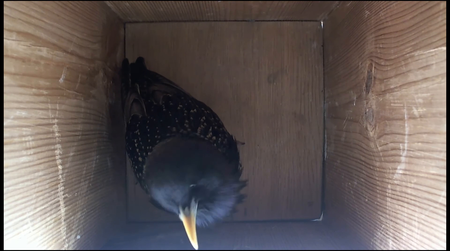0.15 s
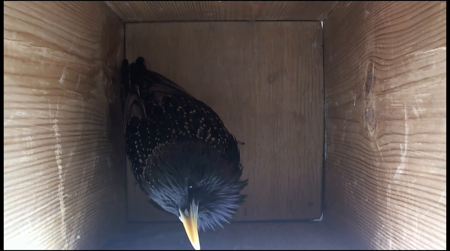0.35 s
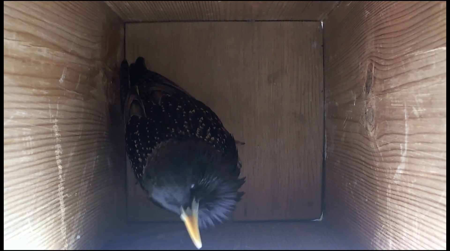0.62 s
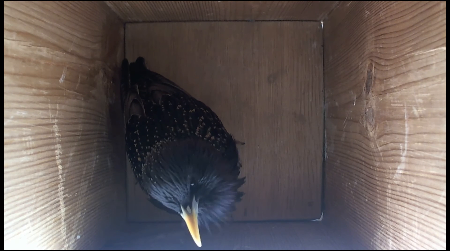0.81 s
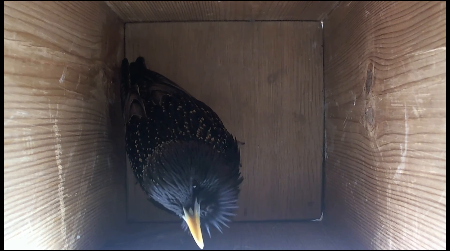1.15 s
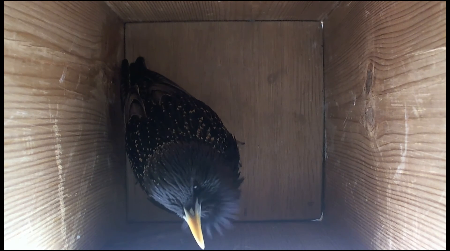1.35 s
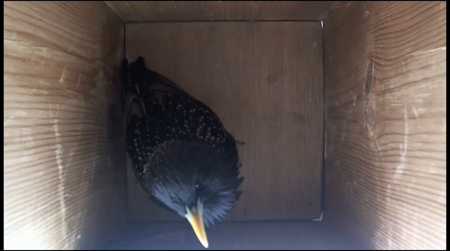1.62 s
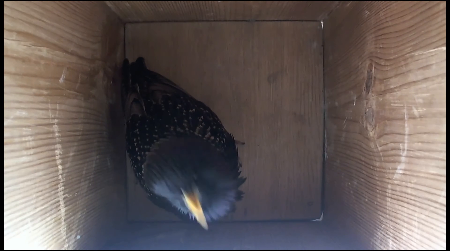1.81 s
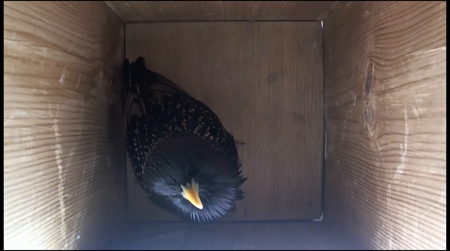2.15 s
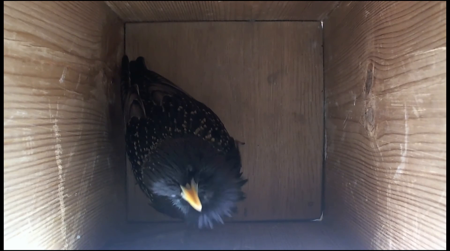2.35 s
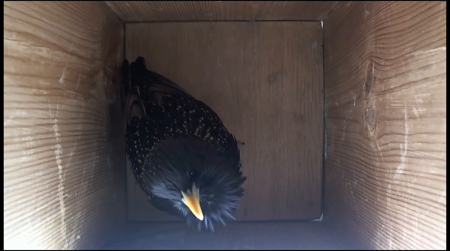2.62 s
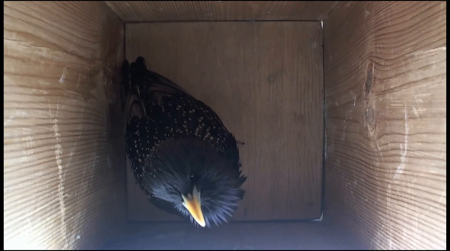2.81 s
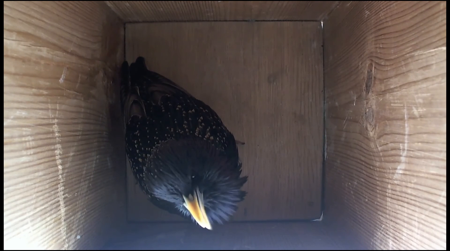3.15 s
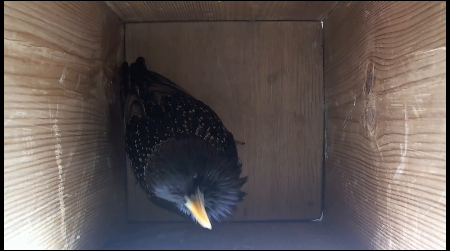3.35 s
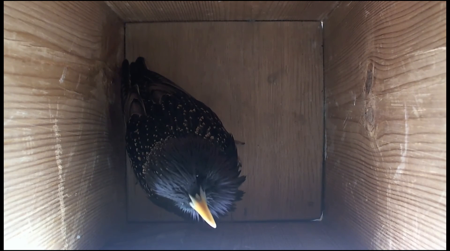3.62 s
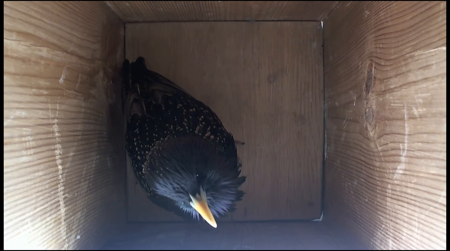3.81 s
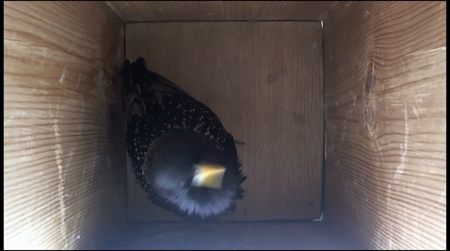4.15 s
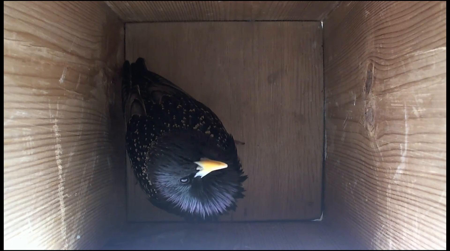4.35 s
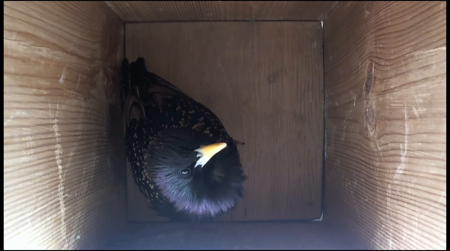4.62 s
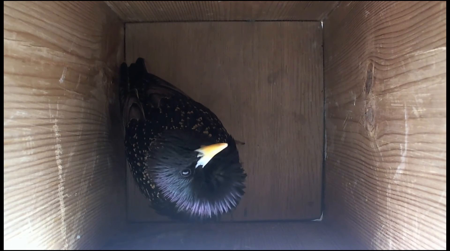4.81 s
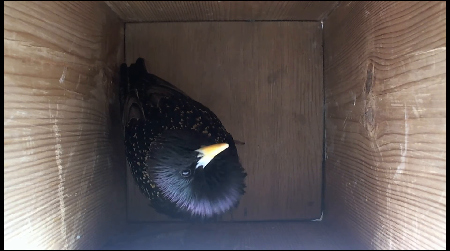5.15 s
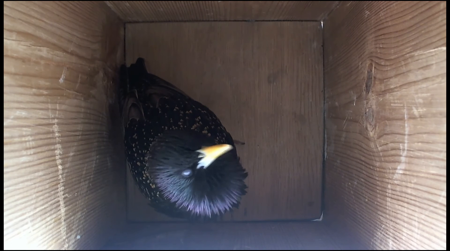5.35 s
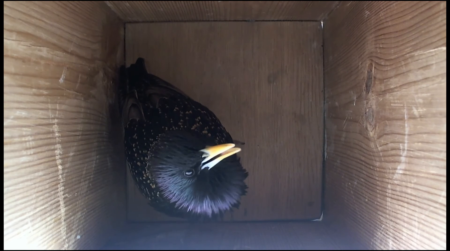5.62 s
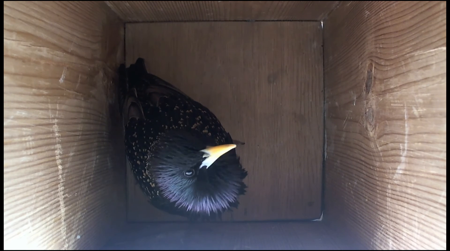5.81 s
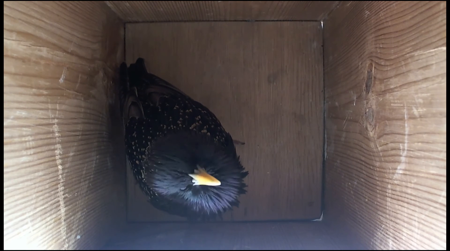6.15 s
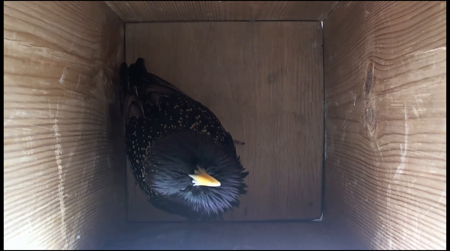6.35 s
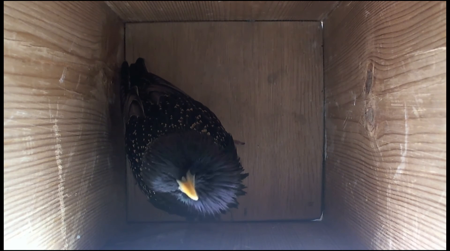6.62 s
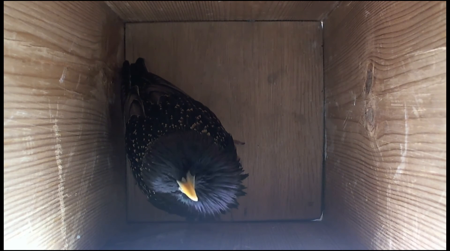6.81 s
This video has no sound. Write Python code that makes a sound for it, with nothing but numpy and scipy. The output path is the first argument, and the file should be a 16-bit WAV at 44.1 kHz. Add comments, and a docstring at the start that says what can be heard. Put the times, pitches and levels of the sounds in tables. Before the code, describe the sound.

A starling sings very close inside a small wooden nest box: whistles, reedy chucks, creaking, then two phrases of rattle, trill and upsweeps.

```python
"""Starling in a nest box

A starling sings inside a wooden nest box, close to a small overloaded microphone. Its two-sided syrinx, built from
swept oscillators, gives whistles, chucks, grunts and a creak, then twice a phrase of rattle, falling whistle,
rasp, trill and two upsweeps. Outside air, as coloured noise, hums faintly in the box; soft bumps and a far bird
are short swells of noise through resonances."""
import sys
import numpy as np
from scipy import signal
from scipy.fft import rfft, irfft, next_fast_len
from scipy.io import wavfile
from scipy.ndimage import uniform_filter1d, map_coordinates

SR = 44100
rng = np.random.default_rng(int(sys.argv[2]) if len(sys.argv) > 2 else 0)


def store_wav(level_fs):
    """Save 16-bit WAV to argv[1]."""
    pcm = np.round(np.clip(np.atleast_2d(level_fs), -1, 1) * 32767)
    wavfile.write(sys.argv[1], SR, pcm.T.astype(np.int16))


N = 307355
T = np.arange(N) / SR

# hoarse grunts: t/s, length/s, f/Hz, voice level/dB, rasp level/dB, low thud level/dB
GRUNTS = [(0, 0.024, 459, -23.5, -26.5, -38), (0.565, 0.038, 385.5, -17, -30.5, -25),
          (.815, 0.022, 426, -15, -21.5, -19.5), (1.353, 0.038, 503, -27, -41, -53),
          (2.247, 0.038, 434, -13, -27.5, -34), (2.313, 0.043, 397.5, -10.5, -16, -33),
          (4.609, 0.061, 398.7, -12, -20.5, -57)]
# relative spectrum of the hoarse noise: f/Hz, level/dB
HOARSE_SPECTRUM = [(220, -31.5), (350, -19.5), (700, -20), (1000, 13), (1250, -15.5), (1500, -5),
                   (2350, -0.5), (2900, -24.5), (4500, -7.5), (5500, -21), (6800, -34.5), (8800, -26),
                   (14000, -34.5)]
# resonances of the rough voice: f/Hz, half-width/Hz, level/dB
RASP_MODES = [(1131, 37, -10.5), (1498, 430, -8), (2250, 300, -2.5), (3630, 1600, -4.5), (4700, 420, -0.5)]
# the phrase, sung twice: t/s, first f of the falling whistle/Hz, arch level/dB, rasp level/dB,
# trill length/s, trill level/dB
PHRASES = [(2.378, 2735, -22.5, -16.5, 0.19, -7.5), (4.708, 2607, -14.5, -14.5, 0.21, -9)]
SETTLE_S = .024  # time constant with which a run of pulses settles after its hard start


def from_db(db):
    """Amplitude ratio of a level: 20 dB per factor of ten."""
    return 10 ** (np.asarray(db) / 20)


def rms_one(x):
    """Normalisation to unit mean power."""
    return x / np.sqrt(np.mean(x ** 2) + 1e-20)


def loudness(x):
    """Short-time energy: the running rms over 120 samples, a few milliseconds."""
    return np.sqrt(np.abs(uniform_filter1d(x ** 2, size=120)))


def add(out, t, sound):
    """Linear superposition of a sound at its times."""
    start = int(round(t[0] * SR))
    out[start:start + len(t)] += sound


def pan(x, left_db):
    """Level difference between the two channels places a sound."""
    return x * from_db([[left_db / 2], [-left_db / 2]])


def burst(start, length):
    """Times and raised-cosine-edged envelope of one short sound."""
    t = T[max(int(start * SR), 0):][:max(int(length * SR), 64)]
    return t, signal.windows.tukey(len(t), .8)


def push(start, length, attack_s, release_s, swell_db=0):
    """One push of air pressure: its times, progress 0-1 and gain (attack, swelling hold, release)."""
    t = T[max(int(start * SR), 0):][:int(length * SR)]
    u = np.linspace(0, 1, len(t))
    attack = np.clip((t - t[0]) / attack_s, 0, 1)
    release = np.clip((t[-1] - t) / release_s, 0, 1)
    return t, u, np.sin(np.pi / 2 * attack * release) ** 2 * from_db(swell_db * (u - .5))


def settle(t, time_s):
    """Exponential relaxation from 1 towards 0 after the start of a note."""
    return np.exp(-(t - t[0]) / time_s)


def wobble(t, hz):
    """Band-limited chance: a spline through hz random knots a second, spread about 1."""
    knots = rng.standard_normal(int((t[-1] - t[0]) * hz) + 4)
    return map_coordinates(knots, [(t - t[0]) * hz + 1], mode="nearest")


def turn(hz):
    """Phase of an oscillator: the time integral of its frequency."""
    return 2 * np.pi * np.cumsum(hz) / SR


def noise(spectrum):
    """Spectral shaping colours white noise, rms 1; levels join straight along log frequency."""
    hz, db = np.transpose(spectrum)
    size = next_fast_len(N)
    log_hz = np.log(np.fft.rfftfreq(size, 1 / SR) + 1)
    gain = from_db(np.interp(log_hz, np.log(hz), db))
    return rms_one(irfft(rfft(rng.standard_normal(size)) * gain, size)[:N])


def resonate(x, modes):
    """Parallel resonances, each a pole pair applied twice for dark valleys."""
    out = 0
    for hz, width_hz, db in modes:
        r = np.exp(-2 * np.pi * width_hz / SR)  # the width is half the bandwidth of one section
        section = [(1 - r * r) / 2, 0, (r * r - 1) / 2, 1, -2 * r * np.cos(2 * np.pi * hz / SR), r * r]
        out = out + from_db(db) * signal.sosfilt([section, section], x + 1e-18)
    return out


def swells(events, modes):
    """Filtered noise: short swells in a few resonances."""
    level = np.zeros(N)
    for s, length, db in events:
        t, gain = burst(s, length)
        add(level, t, from_db(db) * gain)
    return level * rms_one(resonate(rng.standard_normal(N), modes))


def box_air():
    """Broadband air noise coloured by the box; a weak opposed part decorrelates the channels."""
    # relative spectrum of the air in the box: f/Hz, level/dB
    air_spectrum = [(18, -72), (30, -41), (108, -14), (137, -3), (156, -2), (177, -16), (202, 3),
                    (249, -20), (359, 2), (410, -1), (747, -22.5), (1050, -21), (1680, -34), (2360, -21),
                    (3070, -42.5), (10500, -49.5), (15500, -65)]
    # its course: t/s, level/dB
    air_course = [(0, -58.5), (5.5, -56), (6.9, -51.5)]
    common = noise(air_spectrum)
    opposed = from_db(-20.5) * noise(air_spectrum) * [[1], [-1]]
    return from_db(np.interp(T, *np.transpose(air_course))) * (common + opposed)


def far_drone():
    """Resonance turns far noise into a hum in the box."""
    # box resonances: f/Hz, half-width/Hz, level/dB
    drone_modes = [(1020, 136, 1), (2330, 140, -7)]
    # course of the hum: t/s, level/dB
    drone_course = [(0, -80.5), (3.5, -75), (5.8, -67), (6.9, -63.5)]
    hum = rms_one(resonate(rng.standard_normal(N), drone_modes))
    return from_db(np.interp(T, *np.transpose(drone_course))) * hum


def grunts(jitter, flutter, dull_hz=2600, low_hz=290):
    """Flow modulation: a slack low vibration lets out a puff of noise on each cycle; harder is brighter."""
    voice, puffs, hoarse = np.zeros(N), np.zeros(N), noise(HOARSE_SPECTRUM)
    for s, length, hz, db, rasp_db, _ in GRUNTS:
        t, gain = burst(s, length)
        wave = np.sin(turn(hz * (1 + jitter * wobble(t, 400))))
        add(voice, t, np.sqrt(2) * from_db(db) * gain * wave * (1 + flutter * wobble(t, 400)))
        add(puffs, t, from_db(rasp_db) * gain * (1 + .5 * wave))
    dull = signal.sosfilt(signal.butter(4, dull_hz, fs=SR, output="sos"), noise(HOARSE_SPECTRUM))
    bright = puffs / puffs.max()
    rasp = puffs * (bright * hoarse + (1 - bright) * dull)
    return signal.sosfilt(signal.butter(4, low_hz, "high", fs=SR, output="sos"), voice + rasp)


def thuds():
    """Forced resonance: low modes of the box sound under the grunts."""
    # f/Hz, half-width/Hz, level/dB
    chest_modes = [(117.6, 37, -4.5), (190, 46, 2.5)]
    return swells([(row[0], row[1], row[-1]) for row in GRUNTS], chest_modes)


def whistles(notes, jitter, third_db, hoarse_db):
    """Near-sinusoidal oscillation, slightly wavering, with weak overtones and a trace of noise."""
    out, hoarse = np.zeros(N), rms_one(resonate(rng.standard_normal(N), RASP_MODES[-2:]))
    for t, hz, gain, octave_db in notes:
        phase = turn(hz * (1 + jitter * wobble(t, 660)))
        # third harmonic and noise are levelled against the octave
        overtones = np.sin(2 * phase) + from_db(third_db) * np.sin(3 * phase)
        overtones = overtones + from_db(hoarse_db) * np.interp(t, T, hoarse)
        overtones = overtones * from_db(1.5 * wobble(t, 120))
        gain = gain * from_db(.6 * wobble(t, 70))
        add(out, t, np.sqrt(2) * gain * (np.sin(phase) + from_db(octave_db) * overtones))
    return out


def opening_notes(pip_octave_db=-34, high_octave_db=-39, drop_s=0.013):
    """Frequency glides: a pip, a long whistle scooping in and out, a loud higher one; the last two sag."""
    # each: t/s, length/s, f/Hz, level/dB
    pip_note = (.108, 0.0447, 3306.5, -26)
    high_note = (0.3975, 0.14, 2972, 0.51)
    # the long first whistle: t/s, fundamental level/dB, octave level/dB
    first_levels = [(0.122, -36.5, -35), (0.134, -17, -15), (0.146, -16, -16), (0.202, -26.5, -26.5),
                    (0.23, -16.5, -25), (0.372, -10.5, -24.5), (0.386, -13, -16.5), (0.398, -19.5, -29.5)]
    first_hz, first_sag_hz_per_s = 2662, 400
    scoop_hz, scoop_s = 370, .021
    overshoot_hz, overshoot_s, high_sag_hz_per_s = 260, .016, 890
    bow_db = 9  # the higher note is loudest in its middle

    s, length, hz, db = pip_note
    t, u, gain = push(s, length, attack_s=0.01, release_s=0.01497)
    yield t, hz + 0 * u, from_db(db) * gain, pip_octave_db

    s, low_db, octave_db = np.transpose(first_levels)
    t, u, gain = push(s[0], s[-1] - s[0], attack_s=0.0068, release_s=.004)
    scoop = settle(t, scoop_s) + settle(t, drop_s)[::-1]
    hz = first_hz - first_sag_hz_per_s * (t - t[0]) - scoop_hz * scoop
    yield t, hz, gain * from_db(np.interp(t, s, low_db)), np.interp(t, s, octave_db - low_db)

    s, length, hz, db = high_note
    t, u, gain = push(s, length, attack_s=.006, release_s=0.015)
    gain = gain * from_db(bow_db * (np.sin(np.pi * u) ** 3 - 1))
    hz = hz + overshoot_hz * settle(t, overshoot_s) - high_sag_hz_per_s * (t - t[0])
    yield t, hz, from_db(db) * gain, high_octave_db


def glides(notes, jitter, jitter_hz, flutter, octave_db, third_db=-60, swing_hz=0):
    """Frequency modulation: random jitter roughens a gliding tone, a fast regular swing makes a trill."""
    trill_hz = 65.3
    out = np.zeros(N)
    for t, hz, gain in notes:
        swing = swing_hz * np.sin(2 * np.pi * trill_hz * (t - t[0]) + .2 * wobble(t, 60))
        phase = turn(hz * (1 + jitter * wobble(t, jitter_hz)) + swing)
        gain = gain * (1 + flutter * wobble(t, jitter_hz))
        wave = np.sin(phase) + from_db(octave_db) * np.sin(2 * phase) + from_db(third_db) * np.sin(3 * phase)
        add(out, t, np.sqrt(2) * gain * wave)
    return out


def overlap(x):
    """Interference: early returns from the walls beat against a fast-moving tone."""
    # strongest early returns: delay/s, level/dB
    wall_echoes = [(.0021, -3.5), (.0046, -5.5)]
    return x + sum(from_db(db) * np.interp(T - delay, T, x) for delay, db in wall_echoes)


def rasp_notes(break_glide_hz=650):
    """Two independent oscillators: one rough strand as the voice cracks, two climbing in each phrase."""
    # the voice cracks between two notes: t/s, length/s, f/Hz, level/dB
    crack = (.381, .036, 2850, -8)
    # both sides of the syrinx climb at once: from f/Hz, to f/Hz
    strands = [(2000, 3300), (2550, 4450)]
    s, length, hz, db = crack
    t, u, gain = push(s, length, attack_s=.018, release_s=.012)
    yield t, hz + break_glide_hz * (u - .5), from_db(db) * gain
    for s, _, _, db, *_ in PHRASES:
        for from_hz, to_hz in strands:
            t, u, gain = push(s + 0.427, .109, attack_s=0.028, release_s=.02, swell_db=10)
            yield t, from_hz + (to_hz - from_hz) * u, from_db(db) * gain


def rasping():
    """Nonlinear coupling: in the phrases two membranes beating together break into broad noise."""
    strands = overlap(glides(rasp_notes(), jitter=.028, jitter_hz=900, flutter=.35, octave_db=-27))
    broad = rms_one(resonate(rng.standard_normal(N), RASP_MODES))
    return strands + from_db(-14.5) * loudness(strands) * (T > PHRASES[0][0]) * broad


def following_noise(high, rasps):
    """Envelope following: broadband noise that follows the loudness of the high voices and the rasps."""
    # relative spectrum: f/Hz, level/dB
    following_spectrum = [(200, -29.5), (2000, -5.5), (4500, 11.5), (6000, 1), (7000, -12), (8700, -2),
                          (11000, -9.5), (14000, -5.5)]
    return loudness(from_db(-36) * high + from_db(-47) * rasps) * noise(following_spectrum)


def chucks(jitter, rasp_db=-14, uneven_db=3.0):
    """Harmonic series of a slapping valve: the membranes shut for a moment, with rasp."""
    # reedy chucks: t/s, f/Hz, level/dB
    chuck_notes = [(.555, 908.5, -13), (.804, 842, -18), (1.077, 862, -21.5), (1.102, 868, -19),
                   (1.13, 994, -12), (1.157, 1041, -12), (1.188, 1064, -10.5), (1.218, 1019, -9),
                   (1.248, 898, -18.5), (1.282, 780, -19), (1.311, 732.5, -22.5)]
    # how throat and box weight the harmonics: f/Hz, level/dB
    colour = [(720, -16), (850, -5), (1020, -3), (1450, 2.5), (1700, -8), (2050, -2), (3000, -20.5),
              (4400, -25), (5400, -26.5)]
    out, rasp = np.zeros(N), noise(HOARSE_SPECTRUM)
    for s, hz, db in chuck_notes:
        t, u, gain = push(s, 0.028, attack_s=0.0075, release_s=0.016)
        phase = turn(hz * (1 + jitter * wobble(t, 670)))
        tone = 0
        for k in range(1, 6):
            weight = from_db(np.interp(k * hz, *np.transpose(colour)))
            uneven = from_db(uneven_db * (k > 1) * wobble(t, 150))
            tone = tone + weight * np.sin(k * phase + (k - 1) * np.pi / 2) * uneven
        add(out, t, np.sqrt(2) * from_db(db) * gain * (tone + from_db(rasp_db) * np.interp(t, T, rasp)))
    return out


def rattle(runs, modes, jitter, scatter, soft_hz):
    """Impulse excitation: soft pulses, each with a puff of noise, ring the throat and the box."""
    out, soft = np.zeros(N), signal.butter(6, soft_hz, fs=SR, output="sos")
    for t, per_s, gain in runs:
        cycles = np.floor(np.cumsum(per_s * (1 + jitter * wobble(t, 100))) / SR)
        pulses = np.diff(cycles, prepend=-1)
        puffs = signal.lfilter([1], [1, -.992], pulses) * rng.standard_normal(len(t))
        excitation = signal.sosfilt(soft, pulses + scatter * puffs)
        add(out, t, gain * rms_one(resonate(excitation, modes)))
    return out


def creak_runs(hurry_per_s=55, accent_db=8):
    """Relaxing pulse rate: the creak starts fast and hard, then idles."""
    # syrinx pulses: t/s, length/s, level/dB
    creak_run = (.828, 0.27, -28.5)
    s, length, db = creak_run
    t, u, gain = push(s, length, attack_s=0.0089, release_s=0.065)
    pulses_per_s = 76 + hurry_per_s * settle(t, SETTLE_S)
    yield t, pulses_per_s, gain * from_db(db + accent_db * settle(t, SETTLE_S))


def creaking():
    """Source and filter: the creak's pulses ring throat and box resonances."""
    # f/Hz, half-width/Hz, level/dB
    creak_modes = [(226, 86, -5), (406.5, 27, 5), (1030, 22, 2), (1420, 34, -12), (1880, 62, -16)]
    return rattle(creak_runs(), creak_modes, jitter=0.045, scatter=0.1, soft_hz=2800)


def low_tones():
    """Linear frequency glides: short low tones; the first is the box ringing near 1000 Hz between the chucks."""
    # t/s, length/s, f/Hz, glide/Hz, level/dB
    tones = [(1.12, 0.17, 1031, 47.5, -19.5), (2.239, 0.041, 1046, -100, -30.5),
             (2.283, 0.034, 885, 75, -26), (2.303, .044, 1013, 171, -11.5),
             (4.603, 0.048, 1023, -13.5, -17.5)]
    for s, length, hz, glide_hz, db in tones:
        t, gain = burst(s, length)
        yield t, hz + glide_hz * np.linspace(-.5, .5, len(t)), from_db(db) * gain


def far_chips():
    """Band-limited noise bursts: another bird's chips."""
    # t/s, length/s, level/dB
    chips = [(1.468, .025, -69), (1.605, 0.027, -67), (1.745, 0.03, -65.5)]
    # f/Hz, half-width/Hz, level/dB
    chip_modes = [(2300, 600, -1), (3950, 390, 1.5)]
    return swells(chips, chip_modes)


def bumps():
    """Modal response: uneven low noise and soft bumps share two resonances."""
    # soft low bumps: t/s, length/s, level/dB
    bump_events = [(2.14, 0.071, -38.5), (3.57, 0.061, -40.5), (4.29, 0.047, -42), (5.88, 0.098, -34.5)]
    # f/Hz, half-width/Hz, level/dB
    bump_modes = [(125, 16, 3.5), (380.2, 50, -15)]
    uneven = rng.standard_normal(N) * from_db(9.2 * wobble(T, 21))
    return from_db(-52.5) * rms_one(resonate(uneven, bump_modes)) + swells(bump_events, bump_modes)


def tick_runs(level_db=-43, accent_db=19):
    """Pulse train: ticking that opens each phrase hard and soon turns quiet."""
    for s, *_ in PHRASES:
        t, u, gain = push(s - .04, 0.309, attack_s=0.004, release_s=.02)
        yield t, 79, gain * from_db(level_db + accent_db * settle(t, SETTLE_S))


def ticking():
    """Source and filter: the ticks ring their own set of resonances."""
    # f/Hz, half-width/Hz, level/dB
    tick_modes = [(1434, 49, 0.5), (1950, 51, -15.5), (2284, 130, -17), (4160, 54, -17.5)]
    return rattle(tick_runs(), tick_modes, jitter=0.12, scatter=0.06, soft_hz=4200)


def falling_notes(first_octave_db=-28, last_octave_db=-2):
    """Pressure pulses on one long fall in pitch; the octave grows as the beak opens."""
    # pushes within the whistle: delay/s, length/s, level/dB, swell/dB
    fall_pushes = [(0, 0.49, -39, 15), (0.12, 0.14, -24.5, -2), (0.257, 0.152, -16.5, 2.5)]
    fall_s, end_hz, curve = .45, 1967.6, 1.85  # curve above 1: ever slower
    for s, first_hz, *_ in PHRASES:
        effort = np.zeros(N)
        for delay, length, db, swell_db in fall_pushes:
            t, u, gain = push(s + delay, length, attack_s=0.039, release_s=0.015, swell_db=swell_db)
            add(effort, t, from_db(db) * gain)
        t, u, gain = push(s, fall_s, attack_s=.005, release_s=.005)
        hz = end_hz + (first_hz - end_hz) * (1 - u) ** curve
        octave_db = first_octave_db + (last_octave_db - first_octave_db) * u ** 2
        yield t, hz, gain * np.interp(t, T, effort), octave_db


def buzz_runs(level_db=-20.5):
    """Pulse train: a faster buzz swells under the falling whistle."""
    for s, *_ in PHRASES:
        t, u, gain = push(s + .105, 0.1494, attack_s=0.04, release_s=0.041, swell_db=12)
        yield t, 137, from_db(level_db) * gain


def buzzing():
    """Source and filter: irregular buzz pulses ring their own set of resonances."""
    # f/Hz, half-width/Hz, level/dB
    buzz_modes = [(1092, 72, -9), (1474, 21, -0.5), (1943, 23, -3.5), (2400, 26.5, 11.5), (3410, 67, -16.5),
                  (4550, 250, -24)]
    return rattle(buzz_runs(), buzz_modes, jitter=0.29, scatter=0.21, soft_hz=5450)


def arch_notes(lean=0.69, completed=.92):
    """Second oscillator: the syrinx's other side rises over the whistle's end and breaks off coming down."""
    foot_hz, top_hz, foot_db = 2300, 4010, -17  # loudest at its top
    for s, _, db, *_ in PHRASES:
        t, u, gain = push(s + .264, 0.16, attack_s=0.0036, release_s=.02)
        height = np.sin(np.pi * (completed * u) ** lean)
        level_db = db + foot_db * (1 - np.abs(height) ** 6)
        yield t, foot_hz + (top_hz - foot_hz) * height, gain * from_db(level_db)


def trill_notes(swell_db=23):
    """Carrier of the frequency modulation: the trill swells while its centre pitch bows up and back."""
    edge_hz, top_hz = 4130, 4480
    for s, *_, length, db in PHRASES:
        t, u, gain = push(s + 0.497, length, attack_s=0.0084, release_s=0.064, swell_db=swell_db)
        yield t, edge_hz + (top_hz - edge_hz) * np.sin(np.pi * u ** .8), from_db(db) * gain


def sweep_notes():
    """Rising chirp: each upsweep climbs in an S, weakening as it goes, and sags past its top."""
    # t/s, length/s, from f/Hz, top f/Hz, rise/s, level/dB
    sweeps = [(3.083, .11, 3660, 5126, 0.075, -3.5), (3.198, .1, 3718, 5490, 0.067, -7.5),
              (5.426, .11, 3708, 5082, .08, -4), (5.547, .1, 3480, 5495, 0.073, -6.5)]
    sag_hz_per_s = 6500
    for s, length, from_hz, top_hz, rise_s, db in sweeps:
        t, u, gain = push(s, length, attack_s=0.041, release_s=0.035, swell_db=-16)
        climb = np.sin(np.pi / 2 * np.clip((t - s) / rise_s, 0, 1)) ** 2
        sag = sag_hz_per_s * np.maximum(t - s - rise_s, 0)
        yield t, from_hz + (top_hz - from_hz) * climb - sag, from_db(db) * gain


def song():
    """Superposed voices of the starling; the head's direction differs between three groups of them."""
    opening = whistles(opening_notes(), jitter=0.0034, third_db=-37.5, hoarse_db=-29.5)
    falls = whistles(falling_notes(), jitter=0.0033, third_db=-25.5, hoarse_db=-26.5)
    arches = glides(arch_notes(), jitter=.012, jitter_hz=900, flutter=.2, octave_db=-27, third_db=-41)
    rasps = rasping()
    trills = overlap(glides(trill_notes(), jitter=.026, jitter_hz=900, flutter=.25, octave_db=-31,
                            swing_hz=364.5))
    sweeps = overlap(glides(sweep_notes(), jitter=.012, jitter_hz=350, flutter=.2, octave_db=-27))
    high = trills + sweeps
    high = high + from_db(-2) * rasps
    high = high + following_noise(high, rasps)
    low_glides = glides(low_tones(), jitter=.01, jitter_hz=400, flutter=.1, octave_db=-17, third_db=-27)
    reedy = chucks(jitter=.022) + low_glides
    low = grunts(jitter=0.066, flutter=0.11) + thuds()
    pulsed = creaking() + ticking() + buzzing()
    middle = pan(high + falls + arches, left_db=0.1)
    return pan(opening, left_db=2.0) + middle + pan(reedy + low + pulsed, left_db=-1.06)


def nest_box(x, apart):
    """Reverberation: dense, decaying reflections between close wooden walls, nearly alike in both channels."""
    t60_s, box_db = .08, -13
    t = T[:SR // 6]
    mid, side = rng.standard_normal((2, len(t))) * from_db(-60 * t / t60_s) * (t > .001)
    echoes = (mid + apart * side * [[1], [-1]]) / np.sqrt(np.sum(mid ** 2))
    return x + from_db(box_db) * signal.fftconvolve(x, echoes, axes=1)[:, :N]


def standing_wave(x, hz=820, width_hz=300, depth_db=-2):
    """Standing wave: near one pitch the left port lies in a node and the right in a crest."""
    return x + resonate(x.mean(axis=0), [(hz, width_hz, depth_db)]) * [[-1], [1]]


def outside():
    """Superposed background, leaning to the left: humming air, low bumps and a far bird."""
    return pan(box_air() + far_drone() + bumps() + far_chips(), left_db=1.5)


def scene():
    """Superposition of the bird in its box and the background."""
    return standing_wave(nest_box(song(), apart=0.17)) + outside()


def record(dry, hardness=5.3, limit=1.0, low_cut_hz=35):
    """Limiting, then saturation at a lower sample rate: high overtones alias down; bottom and top are cut."""
    recorder_sr, overload, cutoff_hz = 32000, .86, 15750
    x = dry / (1 + (loudness(dry) / limit) ** 4) ** (1 / 4)
    x = signal.resample_poly(x, recorder_sr, SR, axis=1)
    x = x / (1 + np.abs(x / overload) ** hardness) ** (1 / hardness)
    x = signal.resample_poly(x, SR, recorder_sr, axis=1)[:, :N]
    x = signal.sosfilt(signal.butter(2, low_cut_hz, "high", fs=SR, output="sos"), x)
    low_pass = signal.firwin(301, cutoff_hz, fs=SR, window="blackman")
    return signal.fftconvolve(x, [low_pass], "same", axes=1)


dry = scene()
out = record(dry)
store_wav(out)
```